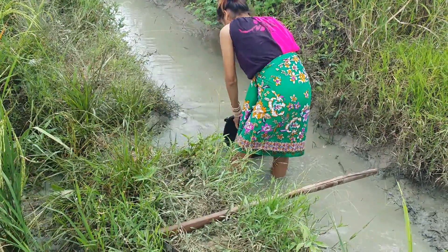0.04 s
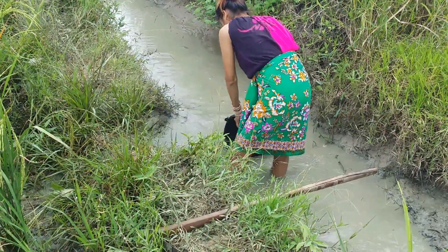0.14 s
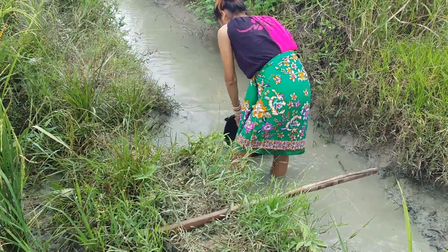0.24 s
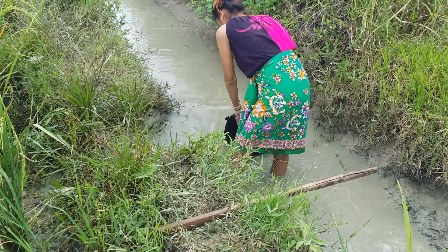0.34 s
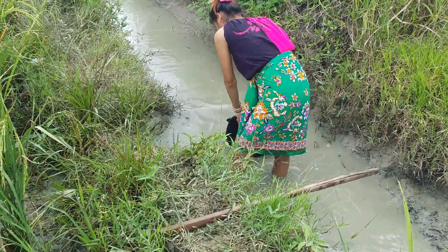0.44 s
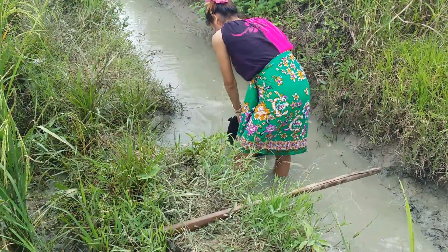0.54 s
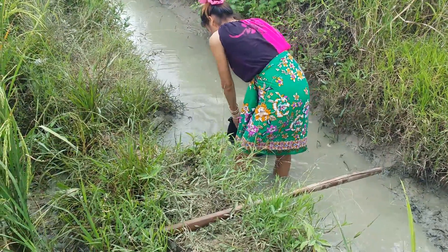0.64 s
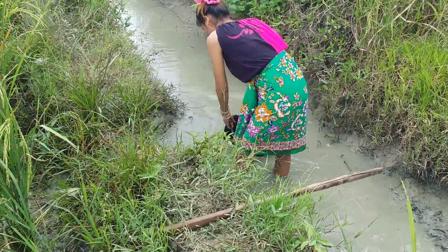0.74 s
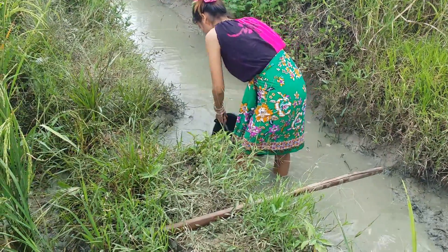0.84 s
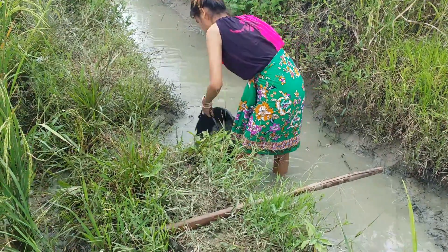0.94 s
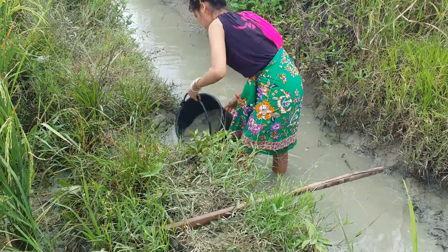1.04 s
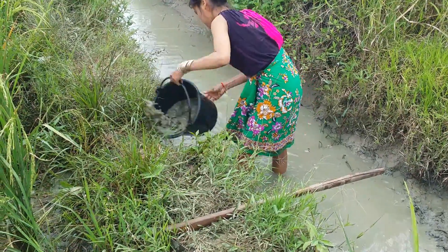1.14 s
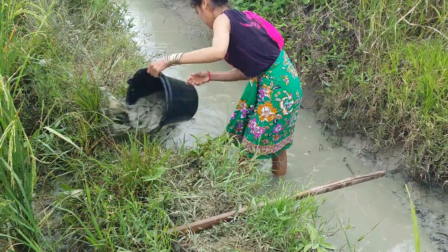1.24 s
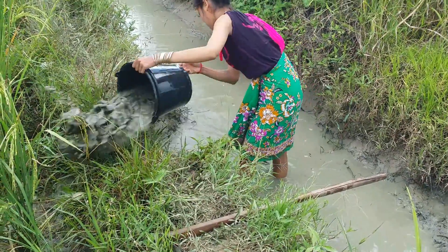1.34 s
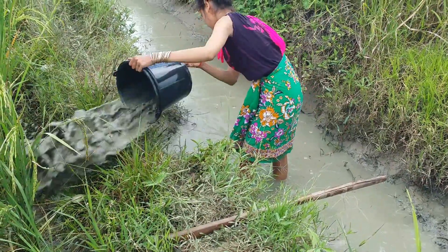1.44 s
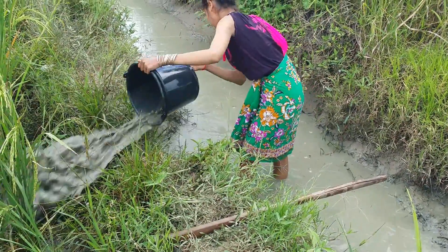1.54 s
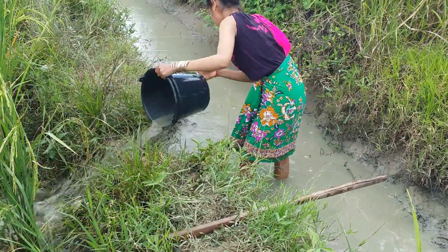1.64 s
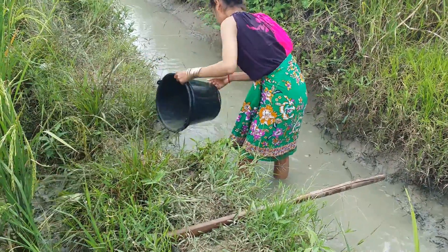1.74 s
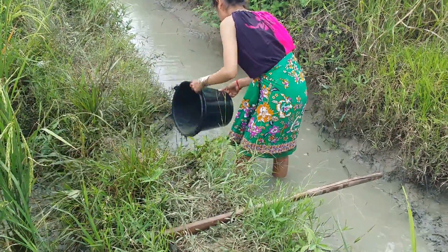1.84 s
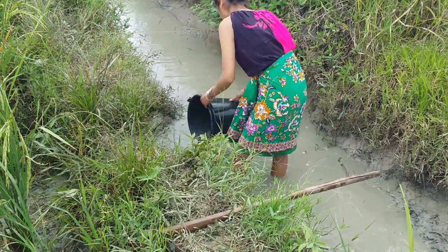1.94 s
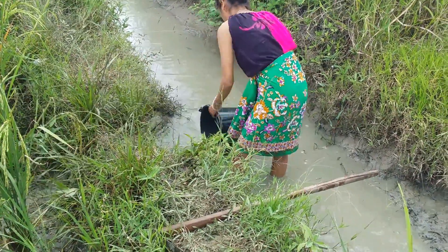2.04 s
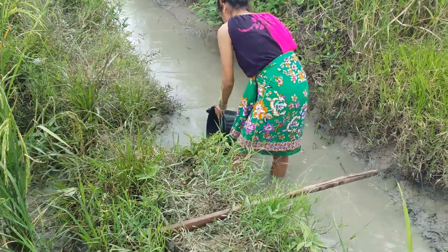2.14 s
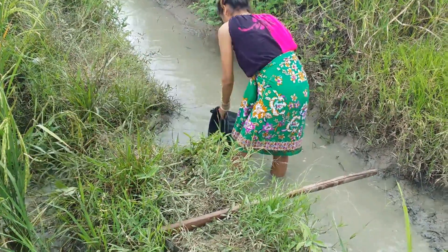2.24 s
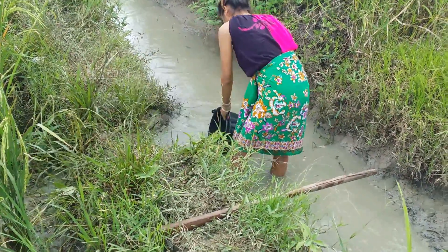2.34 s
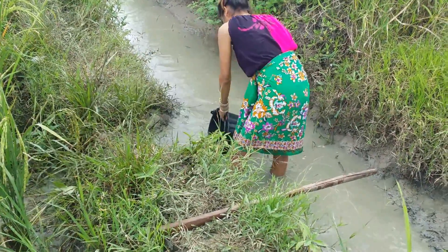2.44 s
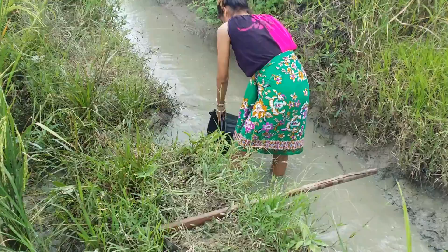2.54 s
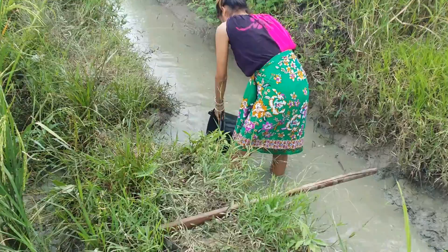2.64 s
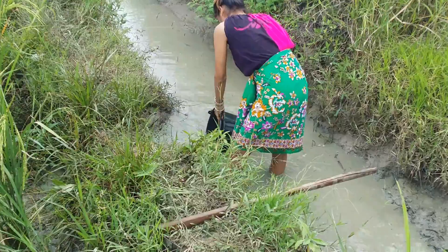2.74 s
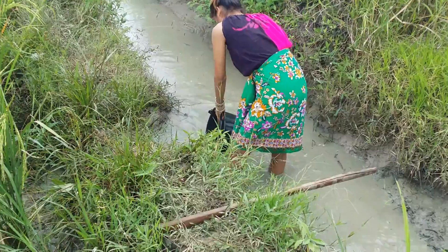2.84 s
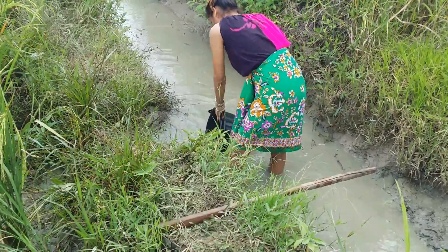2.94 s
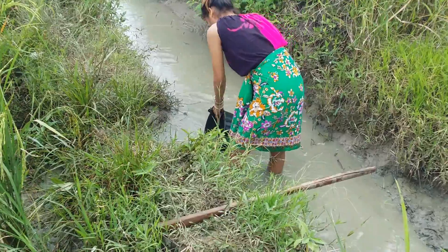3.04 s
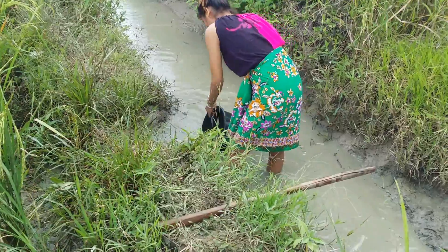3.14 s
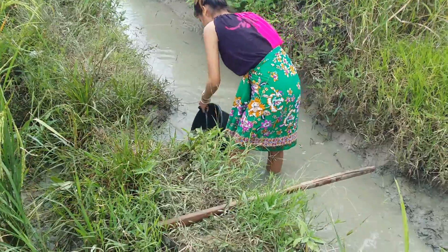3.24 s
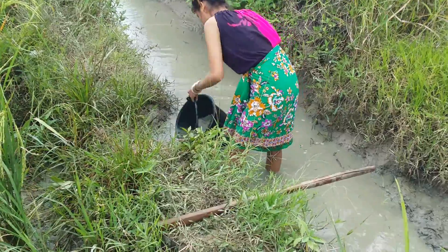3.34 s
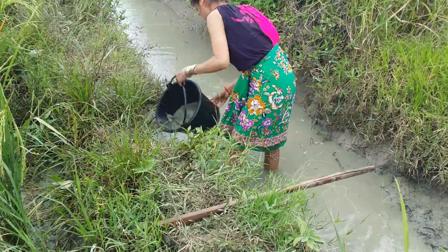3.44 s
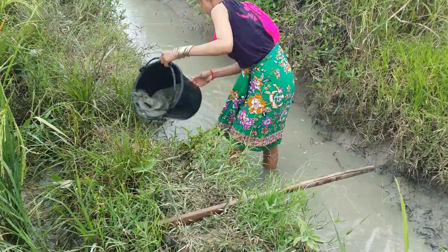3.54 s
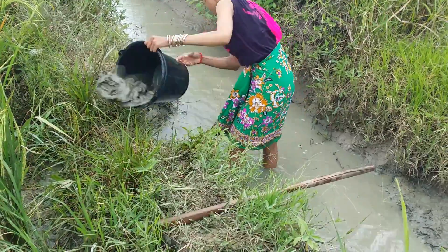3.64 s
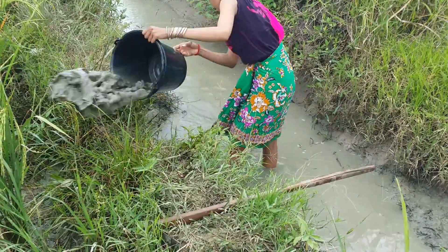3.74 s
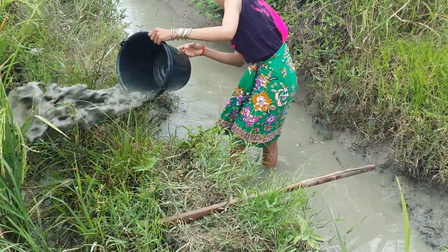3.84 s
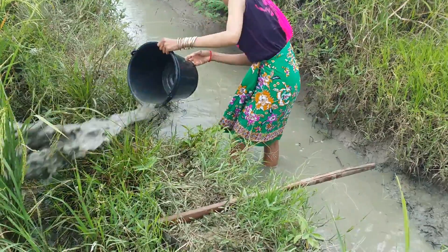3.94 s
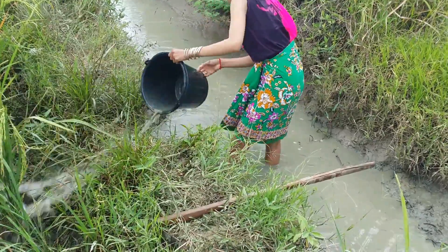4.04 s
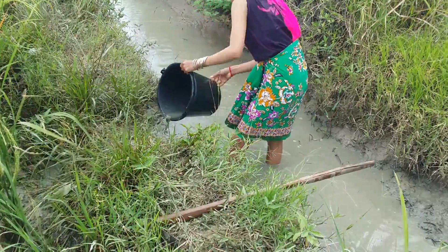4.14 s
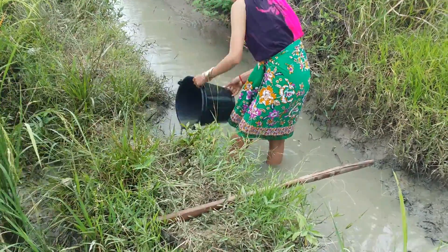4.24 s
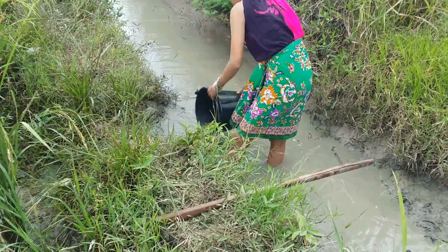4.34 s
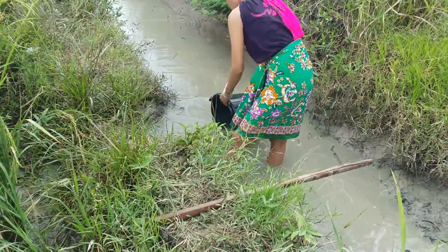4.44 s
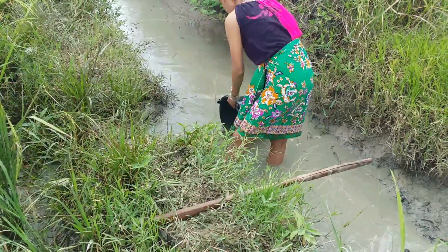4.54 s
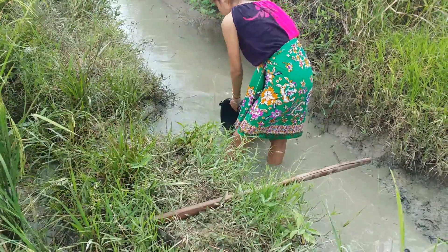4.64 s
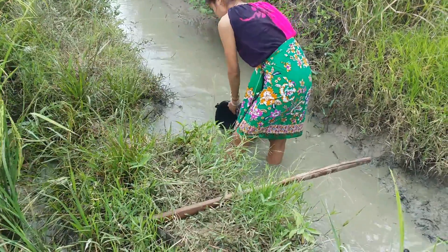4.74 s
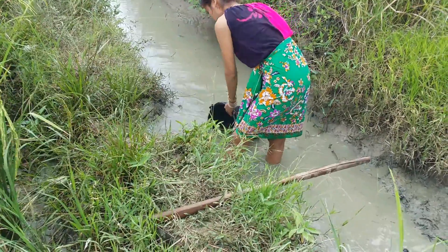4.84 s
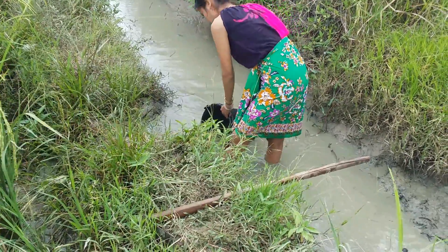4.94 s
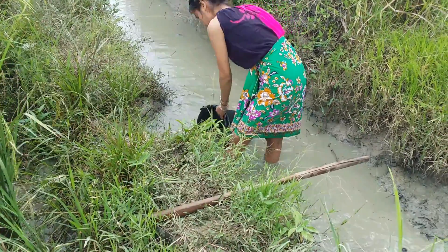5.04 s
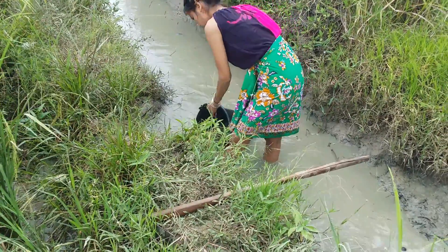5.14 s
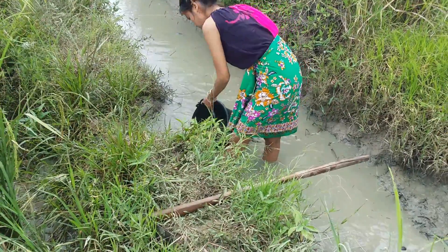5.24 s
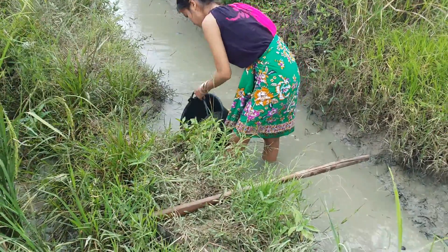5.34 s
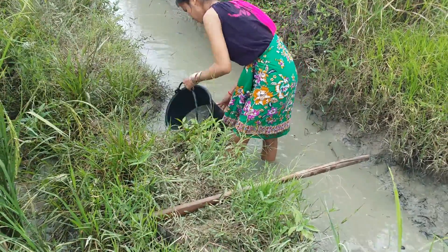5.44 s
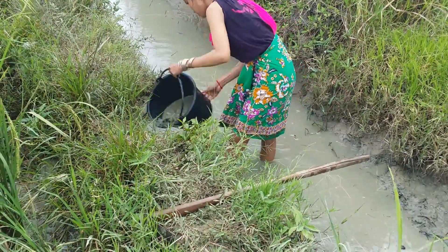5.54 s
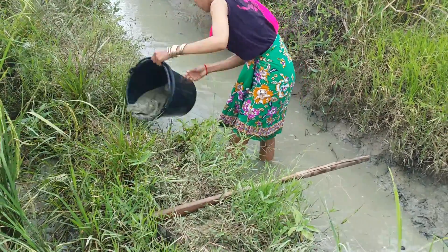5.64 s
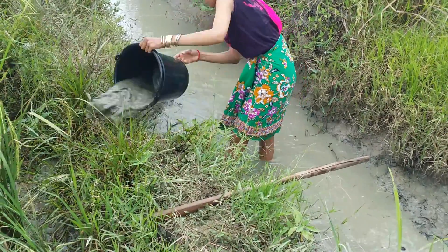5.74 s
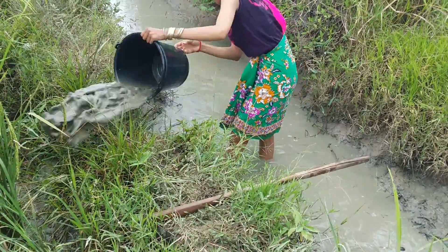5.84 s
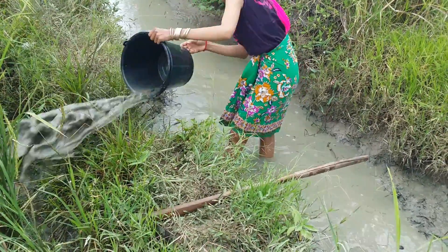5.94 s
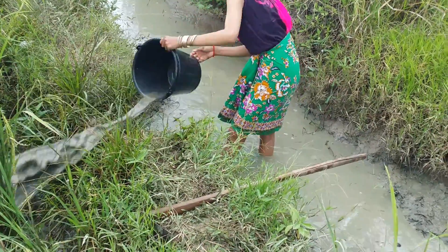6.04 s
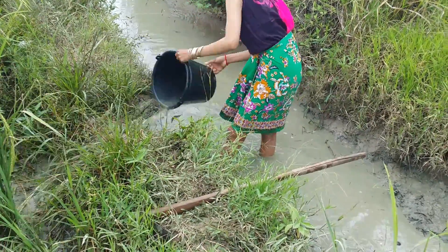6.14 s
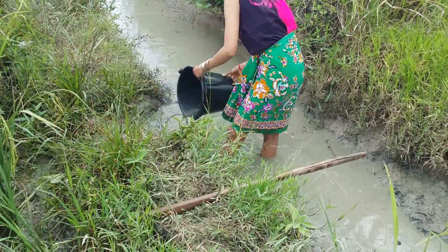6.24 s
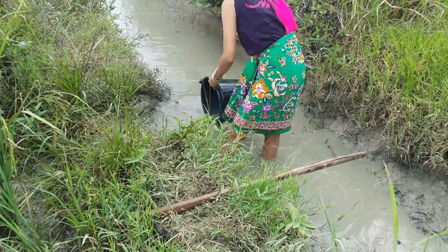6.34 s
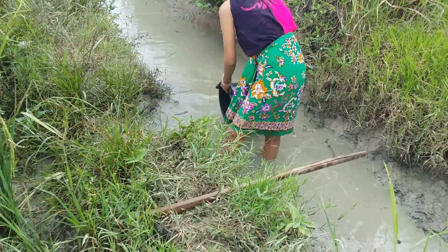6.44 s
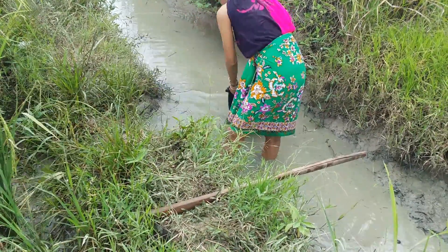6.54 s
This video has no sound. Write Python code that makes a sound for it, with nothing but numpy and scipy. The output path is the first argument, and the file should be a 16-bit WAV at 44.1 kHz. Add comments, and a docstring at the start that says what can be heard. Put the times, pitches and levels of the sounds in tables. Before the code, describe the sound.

A bucket scoops water from a shallow muddy ditch and flings it onto a grassy bank three times, with gurgles and splattering splashes.

```python
"""Grassy bank of a muddy ditch: a plastic bucket scoops water and flings it on the bank, three times.
Spray, churn and slosh are ticks, short rings and shaped noise; plops and gurgles are decaying or gliding
sines; slaps are noise puffs. The emptying bucket booms low, bangles tinkle, a cricket chirps in pairs,
over still air, far rumble and a hum. Two microphone ports, the left shadowed by the body that holds them."""
import sys
import numpy as np
from scipy import signal
from scipy.fft import rfft, irfft
from scipy.io import wavfile
from scipy.ndimage import uniform_filter1d

SR = 44100
rng = np.random.default_rng(int(sys.argv[2]) if len(sys.argv) > 2 else 0)


def output_pcm(signal):
    """Save a mono or channel-first signal as 16-bit PCM at the path in sys.argv[1].

    Samples are clipped to [-1, 1] before scaling.
    """
    pcm = np.clip(np.atleast_2d(signal).T, -1, 1) * 32767
    wavfile.write(sys.argv[1], SR, np.round(pcm).astype(np.int16))


N = 291060  # samples

# water spectra: freq_hz, relative density_db (per Hz)
SPRAY_SPECTRUM = [(1290, -11.5), (2200, -6), (2940, -2.5), (3500, -0.5), (4350, -5.5), (4880, -3.5),
                  (5530, -8.5), (9480, -6), (11600, -11), (14800, -10), (16000, -10)]
CHURN_SPECTRUM = [(240, -30), (400, -28), (446, -5.5), (630, 2), (778, -0.5), (954, 3.5), (1320, 1),
                  (1580, 3), (2600, -8), (3380, -8.5), (5720, -120)]
SLOSH_SPECTRUM = [(62, -40.5), (105, 4.5), (252, -2.5), (285, 0), (334, -2.5), (366, -5), (450, -12),
                  (580, -45.5), (990, -120)]
# spray treble before the flow adds to it: time_s, gain_db
TREBLE_GAIN = [(0, 5), (.4, 0.5), (.8, -5), (1.0, -3.5), (1.4, 4), (1.67, -1.5), (2.2, -0.5), (2.95, -4),
               (3.5, -2), (3.9, 7), (4.13, -2.5), (4.6, 3.5), (4.95, 4), (5.25, -2), (5.6, 4), (6.17, -2),
               (6.6, 2.5)]
TREBLE_DB_PER_DB = 0.16  # per dB of spray over churn
CLUMP_DB, CLUMP_S = 1.6, 0.012  # flicker depth (rms), smoothing length


def water():
    """Droplet ticks, fizz, ringing bubbles and low slosh; harder flow means denser grains."""
    spray_db, churn_db, slosh_db = flow()

    # spray
    tick = rng.standard_normal((2, 200)) * np.exp(-np.arange(200) / 58.0)
    ticks_per_s = 300 * amp(0.43 * (spray_db + 51.5))
    ticks = evened(signal.oaconvolve(grains(ticks_per_s, 1.0), tick, axes=1)[:, :N])
    fizz = bubbles(1968, 12880, 34 * amp(0.7 * (spray_db + 55.5)), cycles=9.6, spread_db=1.8)
    spray = colour(0.37 * ticks + 0.7 * fizz + 1.12 * patchy(0.93, 1.4), SPRAY_SPECTRUM)
    treble_db = np.interp(np.arange(N) / SR, *np.transpose(TREBLE_GAIN))
    treble_db = np.clip(treble_db + TREBLE_DB_PER_DB * (spray_db - churn_db), -9, 9)
    treble = signal.sosfilt(signal.butter(2, 6500, "high", fs=SR, output="sos"), spray)
    spray = spray + (amp(treble_db) - 1) * treble

    # churn
    rings = bubbles(405.6, 2626, 55 * amp(0.7 * (churn_db + 60.5)), cycles=6.5, spread_db=2.6)
    churn = colour(1.27 * rings + 0.5 * ticks + 1.23 * patchy(2.8, 1.5), CHURN_SPECTRUM)

    # slosh: gentle lapping is duller than a throw
    slosh = colour(rng.standard_normal((2, N)), SLOSH_SPECTRUM)
    upper = signal.sosfilt(signal.butter(2, 210, "high", fs=SR, output="sos"), slosh)
    slosh = slosh + (amp(0.64 * (slosh_db + 52.5)) - 1) * upper

    # water lands in clumps
    flicker = evened(uniform_filter1d(rng.standard_normal(N), size=round(CLUMP_S * SR)))
    clumps = evened(amp(CLUMP_DB * flicker))
    return clumps * (amp(spray_db) * spray + amp(churn_db) * churn) + amp(slosh_db) * slosh


# stirred ditch between events: time_s, spray_db, churn_db, slosh_db
DITCH_LEVELS = [(0, -66, -84.5, -62), (.2, -74.5, -81, -70), (.5, -67, -66, -59), (.75, -75.5, -74, -69),
                (1.02, -70, -72, -69.5), (1.1, -55, -58, -64), (1.4, -57, -55, -63), (1.5, -61, -62, -61),
                (2.19, -57.5, -62, -63.5), (2.4, -63.5, -71, -68), (2.63, -80, -83, -77),
                (2.949, -66.5, -69, -66), (3.179, -86.5, -86.5, -74), (3.33, -71.5, -74, -71),
                (3.439, -61, -65.5, -67), (3.701, -60, -59, -64), (3.86, -71.5, -67.5, -68.5),
                (4.65, -59.5, -64.5, -60.5), (4.8, -63, -67, -59), (4.91, -72, -72, -67),
                (5.2, -59.5, -65.5, -63.5), (5.42, -63, -68, -64), (5.72, -65, -67, -57),
                (5.97, -75.5, -80.5, -63.5), (6.6, -79.5, -79, -60.5)]
# short swashes against bucket, legs and grass: peak_s, spray_db, churn_db, slosh_db, swell_s, ebb_s
SWASH_EVENTS = [(0.056, -60, -57.5, -56, .07, 0.062), (.42, -57.5, -57.5, -53.5, .05, 0.043),
                (.55, -61, -52, -65, .07, .03), (.62, -58, -47, -46, .04, .04),
                (.845, -62, -57.5, -67, .05, 0.049), (.92, -63.5, -60, -70.5, .06, 0.059),
                (1.058, -43.5, -52.5, -66, .015, .06), (1.11, -51, -57, -73, .05, 0.037),
                (1.17, -51.5, -63, -73.5, 0.042, .12), (1.24, -54, -54, -67, .06, 0.058),
                (1.32, -52, -52, -50.5, .08, 0.081), (1.38, -51, -51, -57, .08, .07),
                (1.522, -49, -51, -51.5, 0.018, 0.049), (1.63, -31.5, -34, -38, .03, 0.049),
                (1.77, -42.5, -36, -43.5, .03, 0.071), (1.97, -43, -44, -63, .15, .09),
                (2.078, -42, -54, -52.5, .04, .12), (2.281, -60.5, -61, -56.5, .06, 0.053),
                (2.4, -63, -74, -70, 0.074, .06), (2.88, -66, -66, -66, .1, 0.098),
                (3.0, -66, -55, -55, .03, 0.089), (3.4, -58, -63.5, -70, .06, .07),
                (3.47, -52.5, -64, -63, .07, 0.023), (3.53, -56, -55.5, -68, .05, .05),
                (3.679, -56, -57.5, -59.5, .12, 0.097), (4.34, -47.5, -64.5, -62, .06, 0.026),
                (4.415, -55, -62, -65, .04, 0.043), (4.5, -48, -60, -52.5, .06, .07),
                (4.72, -61.5, -60, -66, .07, .07), (4.855, -54.5, -54, -54.5, .06, .05),
                (4.97, -64, -61, -67, .05, .08), (5.06, -60, -62, -62, .05, .07),
                (5.18, -53, -57, -70, .05, 0.048), (5.275, -56.5, -53, -56.5, .07, .12),
                (5.368, -56.5, -62.5, -56, 0.12, .04), (5.5, -60.5, -62, -55, .08, .05),
                (5.62, -62.5, -58, -70, .1, 0.058), (5.7, -57, -63, -55, .03, 0.067),
                (6.166, -36, -34, -35.5, 0.015, 0.029), (6.33, -47, -47.5, -53, .07, .1),
                (6.47, -55.5, -67, -55.5, 0.086, .1)]
SWASH_DB = 20  # level change over one swell_s or ebb_s
# bucketfuls landing on the bank: first_drops_s, sheet_front_s, front_re_top_db, body_s, body_re_top_db,
# top_s, spray_db, churn_db, slosh_db, collapse_s, patter_db, patter_fade_db_per_s, patter_end_s
# (re_top, patter and fade are for the spray)
THROW_EVENTS = [(1.55, 1.585, -11, 1.63, -5, 1.67, -25, -24, -39, 0.095, -40, 22, 2.1),
                (3.973, 4.028, -15, 4.06, -9, 4.135, -25, -28.5, -43.5, 0.07, -37, 49.5, 4.336),
                (6.004, 6.086, -12, 6.13, -8, 6.168, -25.5, -25, -42, .06, -41.5, 38, 6.6)]
FIRST_DROPS_RE_TOP_DB = -34
DRIP_OFF_DB_PER_S = 136  # spray, once the patter ends
# dB under the top per dB of the spray, for spray, churn, slosh
RISE_RATIOS, FALL_RATIOS = [[1], [1.7], [2.25]], [[1], [1.35], [1.13]]


def flow():
    """Levels in dB of spray, churn and slosh: the ditch, every swash and every throw add their power."""
    t = np.arange(0, N / SR + 0.002, 0.001)
    ditch_s, *ditch_db = np.transpose(DITCH_LEVELS)
    power = amp([np.interp(t, ditch_s, db) for db in ditch_db]) ** 2

    for peak_s, *levels_db, swell_s, ebb_s in SWASH_EVENTS:
        slope_db = SWASH_DB * np.where(t < peak_s, (t - peak_s) / swell_s, (peak_s - t) / ebb_s)
        power = power + amp(np.add.outer(levels_db, slope_db)) ** 2

    for (first_s, front_s, front_db, body_s, body_db, top_s, *levels_db,
         collapse_s, patter_db, fade_db_per_s, end_s) in THROW_EVENTS:
        drop_db = patter_db - levels_db[0]
        end_db = drop_db - fade_db_per_s * (end_s - top_s - collapse_s)
        shape_db = np.interp(
            t, [first_s, front_s, body_s, top_s, top_s + collapse_s, end_s, end_s + 1],
            [FIRST_DROPS_RE_TOP_DB, front_db, body_db, 0, drop_db, end_db, end_db - DRIP_OFF_DB_PER_S],
            left=-200)
        ratios = np.where(t < top_s, RISE_RATIOS, FALL_RATIOS)
        power = power + amp(np.array(levels_db)[:, None] + ratios * shape_db) ** 2
    return (np.interp(np.arange(N) / SR, t, db) for db in 10 * np.log10(power))


# single air pockets: start_s, level_db, pitch_hz, decay_cycles (to -60 dB)
PLOP_EVENTS = [(.056, -38, 812, 26), (.332, -29, 285, 28.5), (.394, -40, 3200, 40), (0.416, -38, 1350, 41),
               (0.511, -41, 511, 34), (0.546, -35, 985, 34), (.613, -35, 1570, 30), (.659, -46, 798, 37),
               (.838, -36.5, 780, 25), (.851, -43, 4230, 45), (1.019, -23, 4770, 41),
               (1.054, -32, 2290, 35), (1.056, -33, 3330, 40), (1.13, -31.5, 1370, 37),
               (1.144, -38, 1420, 38), (1.213, -33, 2840, 48), (1.253, -37.5, 906, 33),
               (1.255, -36, 2080, 38), (1.284, -40.5, 283.3, 22), (1.288, -34, 4920, 45),
               (1.333, -36.5, 1680, 37), (1.345, -37, 1540, 35), (1.348, -34, 2080, 38),
               (1.36, -35, 4780, 45), (1.375, -34, 1585, 35), (1.395, -37, 1560, 37),
               (1.451, -43, 1337, 36), (1.521, -29, 1190, 27), (1.521, -35.5, 2370, 35),
               (1.55, -35, 904, 33), (1.603, -22, 1430, 30), (1.656, -16, 3540, 45), (1.748, -28, 655, 30),
               (1.794, -25, 3290, 43), (2.037, -29, 2480, 35), (2.071, -42, 302.6, 43),
               (2.126, -37, 1369, 35), (2.208, -42, 1230, 38), (2.268, -34.5, 325, 21),
               (2.846, -50, 322.5, 25), (2.887, -46.5, 1470, 46), (2.898, -46, 326, 24),
               (2.999, -40, 697, 15), (3.021, -44, 429, 18), (3.214, -34, 699, 40), (3.371, -46.5, 865, 36),
               (3.42, -43, 1310, 42), (3.456, -42, 2405, 46), (3.517, -42, 4430, 45),
               (3.526, -38, 1416, 35), (3.594, -47, 540.5, 20.5), (3.633, -46.5, 367.6, 28.5),
               (3.633, -36, 3110, 38), (3.654, -29, 2880, 37), (3.677, -27.5, 3350, 53),
               (3.754, -44, 3630, 45), (3.799, -47.5, 800, 37), (3.84, -52, 870, 35),
               (4.005, -34, 2279, 35), (4.025, -32, 1510, 35), (4.209, -30.5, 1056, 33),
               (4.243, -32, 1085, 35), (4.326, -27, 7215, 60), (4.343, -35, 2280, 35),
               (4.473, -38, 3631, 42), (4.481, -37, 2313, 38), (4.513, -31, 2960, 39),
               (4.615, -41.5, 2500, 34), (4.731, -30, 284, 18), (4.849, -37.5, 1595, 37),
               (4.85, -41, 2520, 37), (4.873, -39, 1670, 37), (4.947, -46, 1080, 40),
               (4.984, -48, 1290, 40), (5.069, -48, 1029, 35), (5.116, -40, 5120, 50),
               (5.144, -49, 612, 32), (5.174, -39.5, 2032, 35), (5.1745, -19, 5400, 25),
               (5.174, -49, 308.4, 29), (5.277, -40.5, 865, 35), (5.299, -44, 768, 33),
               (5.329, -44, 797, 35), (5.456, -40.5, 1740, 37), (5.583, -44, 890, 40),
               (5.638, -44, 925, 35), (5.714, -48, 308, 27), (5.854, -43.5, 930, 32),
               (5.952, -46, 1749, 22), (6.014, -34.5, 1294, 22.5), (6.086, -27, 1798, 35),
               (6.109, -24, 1370, 33), (6.149, -17, 1141, 30), (6.1635, -8, 962, 22), (6.212, -28, 970, 33),
               (6.232, -29, 975, 36), (6.377, -38, 908, 35)]
PLOP_ATTACK_S, PLOP_ATTACK_CYCLES = 0.0011, 0.56  # summed: large pockets take longer to sound


def plops():
    """Each air pocket rings as a dying sine; small ones generally die sooner."""
    out = np.zeros((2, N))
    chance = rng.standard_normal((len(PLOP_EVENTS), 12))
    for (start_s, level_db, pitch_hz, decay_cycles), (phase, *wobble) in zip(PLOP_EVENTS, chance):
        t = np.arange(round(decay_cycles / pitch_hz * SR)) / SR
        # the surface above it ripples
        ripple_db = 2.34 * np.interp(t, np.linspace(0, t[-1], len(wobble)), wobble)
        decay_db = -60 * t * pitch_hz / decay_cycles
        attack = 1 - np.exp(-t / (PLOP_ATTACK_S + PLOP_ATTACK_CYCLES / pitch_hz))
        # the pitch rises as it nears the surface
        turns = pitch_hz * t * (1 + 0.0011 * pitch_hz * t) + np.array([[0], [phase]])
        add(out, start_s, amp(level_db + ripple_db + decay_db) * attack * np.sin(2 * np.pi * turns))
    return out


# air tearing out of a necked hollow: start_s, level_db, first_pitch_hz, last_pitch_hz, length_s
GURGLE_EVENTS = [(0.828, -45.5, 695, 1350, 0.0182), (0.849, -55, 704, 600, 0.016),
                 (0.904, -54, 620, 600, 0.018), (0.926, -53.5, 670, 835, 0.0072),
                 (1.242, -53, 516, 670, 0.025), (1.286, -46, 946, 1170, 0.02),
                 (1.311, -45.5, 828, 1005, 0.039), (1.383, -46.5, 774, 840, 0.024),
                 (3.678, -45, 562, 1074, 0.043), (3.682, -44.5, 1002, 955, 0.0213),
                 (3.731, -44.5, 808, 720, 0.031), (3.756, -54.5, 696, 690, 0.033),
                 (4.753, -54, 1300, 882, 0.02), (4.995, -61.5, 1250, 1399, 0.029),
                 (0.545, -45.5, 1700, 1890, 0.009), (5.595, -61, 998, 930, .045),
                 (3.215, -49, 1173, 730, 0.0049)]


def gurgles():
    """A tone that swells, flutters and glides while the hollow changes size."""
    out = np.zeros((2, N))
    chance = rng.standard_normal((len(GURGLE_EVENTS), 18))
    for (start_s, level_db, first_hz, last_hz, length_s), (p, q, *flutter) in zip(GURGLE_EVENTS, chance):
        hz = np.geomspace(first_hz, last_hz, round(length_s * SR))
        knots_s = np.arange(len(flutter)) * 0.0065
        flutter_db = 2.3 * np.interp(np.arange(len(hz)) / SR, knots_s, flutter)
        tone = np.sin(2 * np.pi * (np.cumsum(hz) / SR + np.array([[p], [q]])))
        add(out, start_s, amp(level_db + flutter_db) * signal.windows.tukey(len(hz), 0.45) * tone)
    return out


# sheets and drops slapping a surface: start_s, puff_db, centre_hz, width_octaves, smack_db
SLAP_EVENTS = [(0.0566, -48, 7940, 0.81, -69), (0.416, -49.5, 2600, .95, -53), (0.59, -54, 2730, 1, -39.5),
               (0.614, -44, 3280, 0.76, -30.5), (1.0545, -33, 4670, 0.27, -41),
               (1.065, -36, 4630, 0.23, -57), (1.1002, -42, 3380, .98, -46),
               (1.3126, -36.5, 6650, 0.86, -65), (1.3437, -37, 5200, 0.84, -50),
               (1.5196, -65, 2537, 0.85, -47), (1.5595, -35.5, 3500, 0.93, -35.5),
               (1.584, -21.5, 5970, 0.64, -33.5), (1.763, -25.5, 3830, 0.43, -39),
               (2.038, -29, 7900, 0.25, -42), (2.043, -33, 3450, 0.6, -47), (2.0715, -34, 4230, 0.38, -52),
               (2.422, -53.5, 2996, 0.5, -70), (2.8485, -54, 2760, 0.38, -76),
               (2.9557, -52, 4050, .48, -64), (2.9983, -57, 1998, .5, -46),
               (3.3723, -45.5, 3055, 0.98, -77.5), (3.3907, -51, 2600, 1, -72),
               (3.4692, -43, 3903, 0.48, -52), (3.5087, -48, 3660, .56, -64), (3.5265, -47, 4850, 0.3, -54),
               (3.6342, -47, 3140, 1, -56), (3.6548, -47, 3220, .94, -68), (3.8401, -55, 3150, .97, -50.5),
               (3.948, -41, 8110, 0.53, -68), (4.0173, -37, 3090, 1, -44), (4.244, -38, 3000, 0.88, -44),
               (4.309, -40, 3450, .89, -43), (4.345, -40, 5000, .4, -63), (4.5145, -37.5, 3050, 0.42, -44),
               (4.8343, -42, 3690, .3, -46), (4.8736, -41, 4434, 0.32, -42), (5.0506, -53, 4320, 0.97, -57),
               (5.1658, -42, 8040, 0.94, -62), (5.1755, -25.5, 10000, 0.49, -54),
               (5.2629, -43, 4450, 0.84, -54), (5.2799, -43, 3870, .64, -59), (5.36, -48, 3130, .75, -58),
               (5.465, -42, 8740, 0.91, -52), (5.4875, -45, 3670, .95, -68), (5.5445, -45, 5250, .75, -60),
               (5.5817, -66, 2940, 0.99, -41), (5.637, -45.5, 4510, 0.76, -69),
               (5.683, -40, 5100, .98, -40.5), (6.0882, -31.5, 2680, 0.91, -48),
               (6.1626, -24, 2496, .95, -20.5), (6.3007, -32, 4027, 1, -49), (6.355, -38, 4550, 0.59, -55),
               (6.426, -38, 5490, 0.65, -60), (6.4968, -41, 3420, 0.35, -65)]
SLAP_T60_S = 0.014  # for a 3500 Hz centre


def slaps():
    """Each slap is a sudden bright puff of noise over a duller smack, with a faint spattering tail."""
    out = np.zeros((2, N))
    noise = rfft(rng.standard_normal((len(SLAP_EVENTS), 2, 4096)))
    t, hz = np.arange(4096) / SR, np.fft.rfftfreq(4096, 1 / SR) + 1
    for (start_s, puff_db, centre_hz, width_octaves, smack_db), n in zip(SLAP_EVENTS, noise):
        t60_s = SLAP_T60_S * (3500 / centre_hz) ** 0.35  # finer drops are over sooner
        puff_band = np.exp(-(np.log2(hz / centre_hz) / width_octaves) ** 2)
        smack_band = np.exp(-np.log2(hz / 1200) ** 2)
        puff = amp(puff_db) * evened(irfft(n * puff_band))
        smack = amp(smack_db) * evened(irfft(n * smack_band))
        decay = amp(-60 * t / t60_s) + 0.16 * amp(-18 * t / SLAP_T60_S)
        attack = 1 - np.exp(-t / 0.00087)
        add(out, start_s, decay * attack * (puff + smack))
    return out


# air in the emptying bucket: loudest_s, level_db, pitch_hz, swell_s
BOOM_EVENTS = [(1.365, -49, 93.8, 0.14), (3.675, -50, 100, 0.058), (5.745, -48.5, 95, 0.056)]
BOOM_START_DB, BOOM_FADE_DB_PER_S, BOOM_TAIL_S = -22, 188, 0.21


def bucket():
    """The hollow hums one low note while the load slides out."""
    out = np.zeros((2, N))
    for loudest_s, level_db, pitch_hz, swell_s in BOOM_EVENTS:
        t = np.arange(-swell_s, BOOM_TAIL_S, 1 / SR)
        shape_db = np.where(t < 0, BOOM_START_DB * (t / swell_s) ** 2, -BOOM_FADE_DB_PER_S * t)
        note = np.sqrt(2) * np.sin(2 * np.pi * pitch_hz * t)
        boom = amp(level_db + shape_db) * note * signal.windows.tukey(len(t), 0.2)
        add(out, loudest_s - swell_s, boom[None])
    return out


# ring modes, upper then lower: pitch_hz (nominal), level_db, t60_s
BANGLE_MODES = [(13550, -1.5, 0.22), (8600, -20, 0.29)]
# bangles touching: start_s, level_db, lower_mode_extra_db
TINKLE_EVENTS = [(0.9772, -55, 10), (1.025, -49.5, 17.5), (1.1598, -54, 0), (1.252, -51, 8),
                 (1.9071, -57, 10), (2.0033, -45, -10.5), (3.6153, -53, 3), (3.688, -58, 0),
                 (3.732, -49.5, 14.5), (4.2662, -39, -5), (5.2345, -51, -3), (5.3956, -64, 1),
                 (5.7568, -56.5, 13)]


def bangles():
    """Thin rings; each touch sounds slightly different ones, beating."""
    out, t = np.zeros((2, N)), np.arange(12000) / SR
    chance = rng.random((len(TINKLE_EVENTS), 2, 4))
    for (start_s, level_db, lower_db), draws in zip(TINKLE_EVENTS, chance):
        for (pitch_hz, mode_db, t60_s), extra_db, (a, b, p, q) in zip(BANGLE_MODES, (0, lower_db), draws):
            phase = np.array([[p], [q]])
            pair = sum(np.sin(2 * np.pi * (pitch_hz * (1 + 0.028 * (detune - 0.5)) * t + phase))
                       for detune in (a, b))
            add(out, start_s, 0.5 * amp(level_db + mode_db + extra_db - 60 * t / t60_s) * pair)
    return out


CRICKET_HZ, CRICKET_DB = 8300, -70.5
FIRST_S, PERIOD_S, PAIR_S, CHIRP_S = 0.091, 0.186, 0.046, 0.024


def cricket():
    """A steady high sine gated into two short chirps per period."""
    t = np.arange(N) / SR
    beat_s = (t - FIRST_S) % PERIOD_S
    gate = sum(np.sin(np.pi * np.clip((beat_s - delay_s) / CHIRP_S, 0, 1)) for delay_s in (0, PAIR_S))
    return amp(CRICKET_DB) * gate * np.sin(2 * np.pi * (CRICKET_HZ * t + rng.random((2, 1))))


# still outdoor air, far rumble: freq_hz, relative density_db (per Hz)
AIR_SPECTRUM = [(65, -23.5), (110, 0.5), (332, -24), (463, -13.5), (748, -11.5), (960, -17.5),
                (1690, -23.5), (1910, -25), (4580, -20.5), (6140, -26.5), (8560, -24), (14700, -25),
                (16000, -30)]
RUMBLE_SPECTRUM = [(15, -52.5), (25, -25), (27, -27), (39, -4.5), (59, 1.5), (135, -3), (220, -10),
                   (290, -55), (480, -120)]
AIR_DB, RUMBLE_DB = -66.5, -64
# low hum from far off: time_s, level_db
HUM_LEVELS = [(0, -67), (.9, -80), (1.15, -65), (1.73, -66), (2.04, -60), (2.65, -76), (3.33, -78),
              (3.64, -60), (3.9, -71), (4.15, -62), (4.82, -64), (5.05, -71), (5.7, -62), (5.96, -66.5),
              (6.4, -59.5), (6.6, -68)]
HUM_HZ, HUM_WANDER_HZ = 62.2, 2.75  # centre, rms


def distance():
    """Still air and far rumble as shaped noise, and a low hum that wavers."""
    t = np.arange(N) / SR
    hz = HUM_HZ + HUM_WANDER_HZ * evened(uniform_filter1d(rng.standard_normal(N), size=8000))
    hum_db = np.interp(t, *np.transpose(HUM_LEVELS))
    hum = np.sqrt(2) * amp(hum_db) * np.sin(2 * np.pi * np.cumsum(hz) / SR)
    rumble = colour(rng.standard_normal((2, N)), RUMBLE_SPECTRUM)
    air = colour(patchy(3.9, 0), AIR_SPECTRUM)
    return amp(AIR_DB) * air + amp(RUMBLE_DB) * rumble + hum


def bubbles(lo_hz, hi_hz, per_s, cycles, spread_db):
    """Bubbles of many sizes, each a short ring that bends in pitch; power per Hz is even over the band."""
    spectrum, t = 0, np.arange(1200) / SR
    pitches_hz = np.geomspace(lo_hz, hi_hz, num=20)
    bends = rng.uniform(-0.0024, 0.0035, size=20)
    for hz, bend in zip(pitches_hz, bends):
        envelope = np.exp(-t * hz / cycles) * (1 - np.exp(-t * hz))
        ring = np.sin(2 * np.pi * hz * t * (1 + bend * hz * t)) * envelope
        spectrum = spectrum + rfft(grains(per_s, spread_db)) * rfft(hz * ring, N)
    return evened(irfft(spectrum, N))


def grains(per_s, spread_db):
    """Random impacts, a few of them large; the second row has the same sizes with its own signs."""
    out = np.zeros((2, N))
    at = np.flatnonzero(rng.random(N) < per_s / SR)
    size, left, right = rng.random((len(at), 3)).T
    size = amp(spread_db * np.minimum(-np.log(1 - size), 3.2)) / np.sqrt(per_s[at])
    out[:, at] = size * np.sign(np.array([left, right]) - 0.5)
    return out


def patchy(depth_db, broad_db):
    """Noise whose level drifts in small and in broad patches of time and pitch."""
    z = signal.stft(rng.standard_normal((2, N)), nperseg=256, noverlap=192)[2]
    patches = smooth(rng.standard_normal(z.shape[1:]), 6, 8)
    broad = smooth(patches, 6, 30)
    gain = amp(depth_db * evened(patches) + broad_db * evened(broad))
    return evened(signal.istft(z * gain, nperseg=256, noverlap=192)[1][:, :N])


def smooth(grid, bins, frames):
    """Moving average over frequency, then time."""
    return uniform_filter1d(uniform_filter1d(grid, size=bins, axis=0), size=frames, axis=1)


def colour(x, spectrum):
    """Filters x by a spectrum and sets rms 1."""
    gain = amp(read(spectrum, np.fft.rfftfreq(x.shape[1], 1 / SR)))
    return evened(irfft(rfft(x) * gain, x.shape[1]))


def amp(db):
    """dB to amplitude."""
    return 10 ** (np.asarray(db) / 20)


def evened(x):
    """Scales x to rms 1."""
    return x / np.sqrt(np.mean(x ** 2) + 1e-20)


def read(points, hz):
    """Interpolates a table over log frequency."""
    f, value = np.transpose(points)
    return np.interp(np.log(hz + 1), np.log(f + 1), value)


def add(mix, start_s, sound):
    """Adds sound into mix, cut at the end."""
    part = mix[:, round(start_s * SR):][:, :sound.shape[1]]
    part += sound[:, :part.shape[1]]


def ports(pair, shadow, same, lead):
    """Right hears row 0; left hears it turned in phase, shadowed and mixed with the scattered row 1."""
    hz = np.fft.rfftfreq(N, 1 / SR)
    direct, scattered = rfft(pair)
    likeness = np.clip(read(same, hz), 0, 1)
    gain = amp(read(shadow, hz))
    turn = np.exp(1j * read(lead, hz))
    left = gain * (likeness * turn * direct + np.sqrt(1 - likeness ** 2) * scattered)
    # holds the level of the two ports' average
    level = 2 / np.sqrt(1 + gain ** 2 + 2 * likeness * gain * turn.real)
    return irfft(np.array([left, direct]) * level, N)


# left minus right, near sources and all around: freq_hz, difference_db
NEAR_SHADOW = [(60, 6), (110, -6.5), (200, -2), (380, -5), (700, -2.0), (1290, -5), (2380, -12), (4400, -8),
               (8120, -18.5), (15000, -10.5)]
FAR_SHADOW = [(60, -3), (400, -2), (2400, -4), (4400, -3), (8100, -7.5), (15000, -3)]
# likeness of the ports, near and all around: freq_hz, likeness (0 to 1)
NEAR_LIKENESS = [(60, .98), (300, .97), (700, .93), (1400, .78), (3000, .45), (7000, .25), (15000, .15)]
FAR_LIKENESS = [(60, .97), (200, .93), (500, .3), (1400, .1), (15000, .05)]
# left phase turn, near sources: freq_hz, lead_rad
NEAR_LEAD = [(60, 0), (1100, .1), (1460, -.5), (1810, -3.6), (2840, -7.8), (15000, -7.8)]


def scene():
    """Near sources and surroundings, each through its own port pattern."""
    near = water() + plops() + gurgles() + slaps() + bucket() + bangles()
    far = cricket() + distance()
    near_ports = ports(near, NEAR_SHADOW, NEAR_LIKENESS, NEAR_LEAD)
    far_ports = ports(far, FAR_SHADOW, FAR_LIKENESS, lead=[(60, 0.048)])
    return near_ports + far_ports


EDGE_HZ = 15800


def record(dry):
    """Band limit: linear-phase low-pass."""
    lowpass = signal.firwin(511, EDGE_HZ, window=("kaiser", 9), fs=SR)
    return signal.oaconvolve(dry, lowpass[None], "same")


dry = scene()
out = record(dry)
output_pcm(out)
```